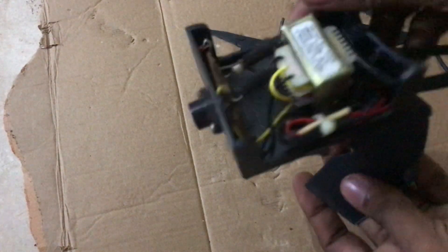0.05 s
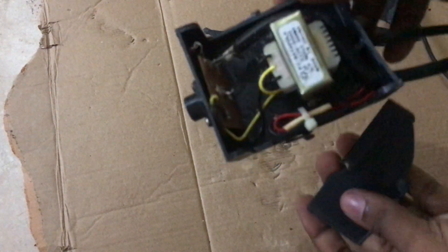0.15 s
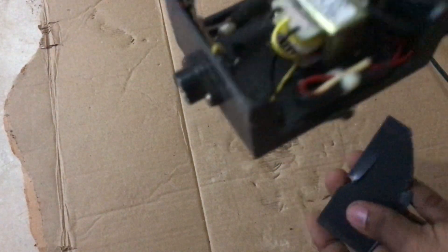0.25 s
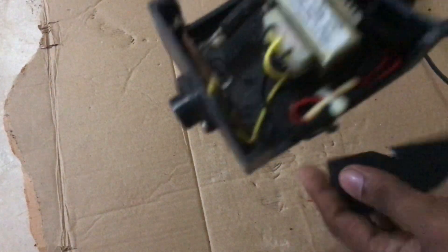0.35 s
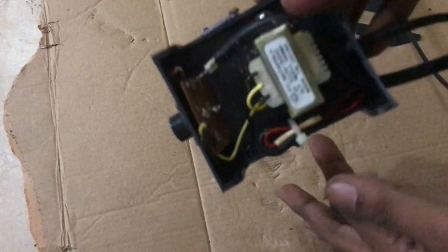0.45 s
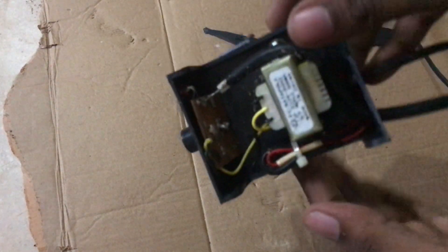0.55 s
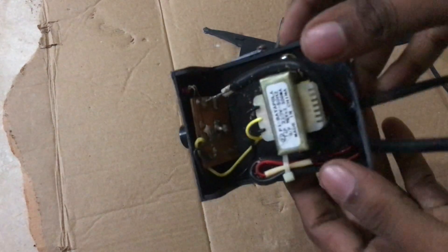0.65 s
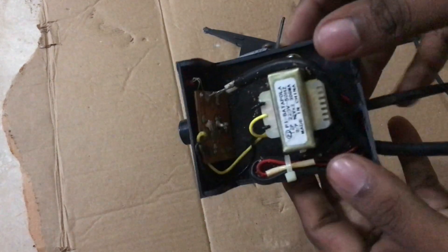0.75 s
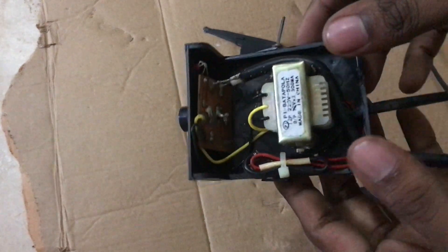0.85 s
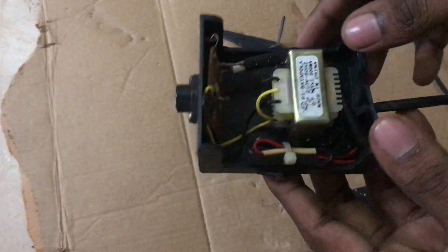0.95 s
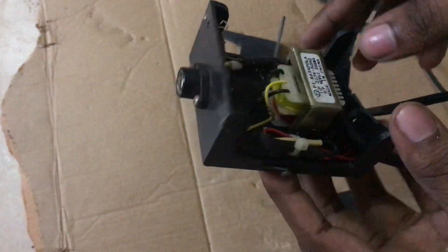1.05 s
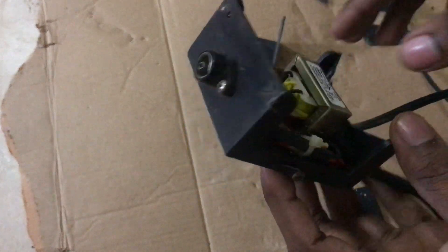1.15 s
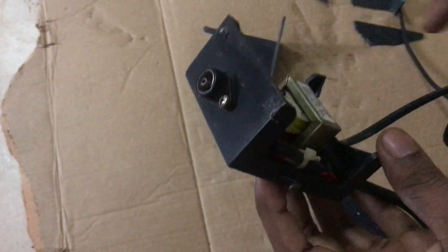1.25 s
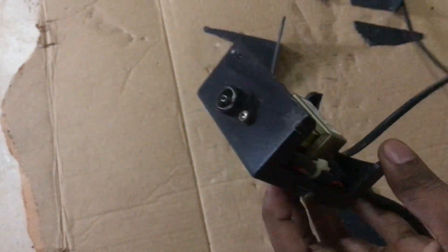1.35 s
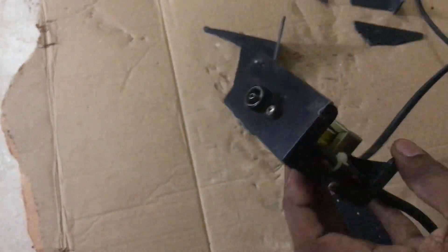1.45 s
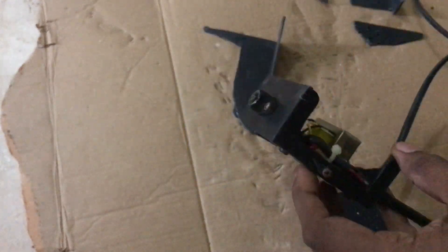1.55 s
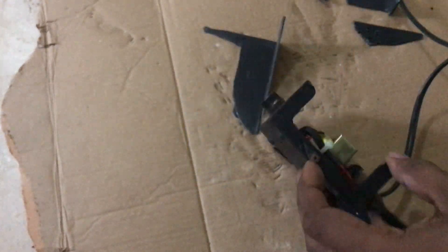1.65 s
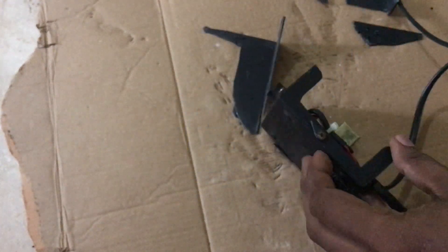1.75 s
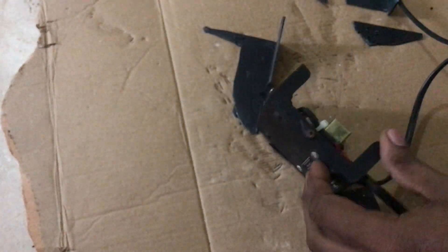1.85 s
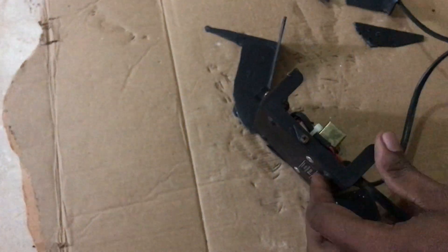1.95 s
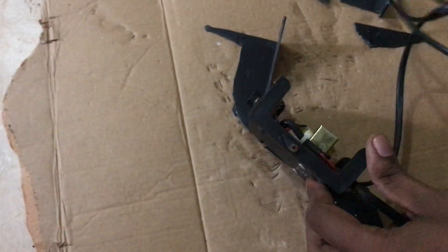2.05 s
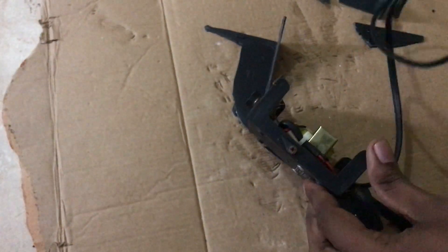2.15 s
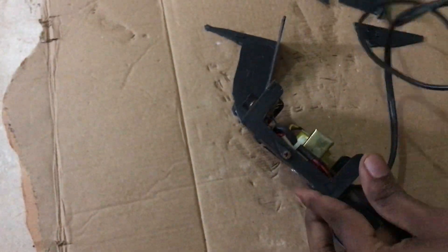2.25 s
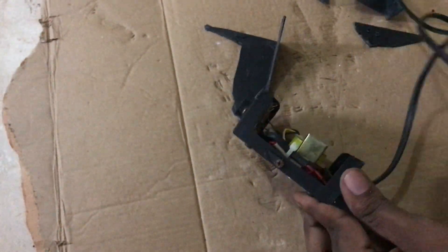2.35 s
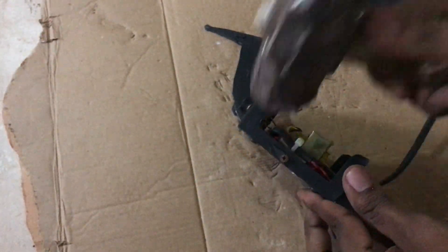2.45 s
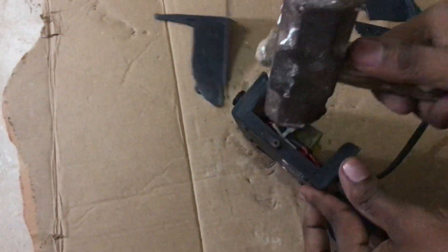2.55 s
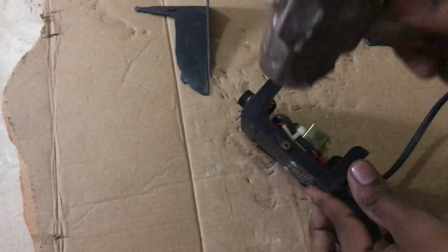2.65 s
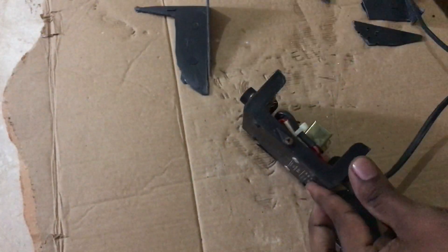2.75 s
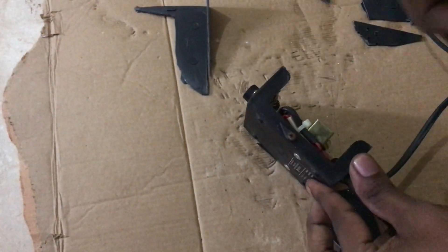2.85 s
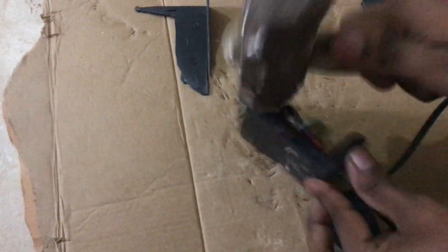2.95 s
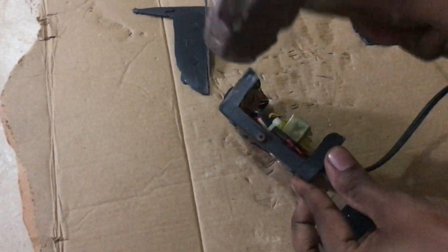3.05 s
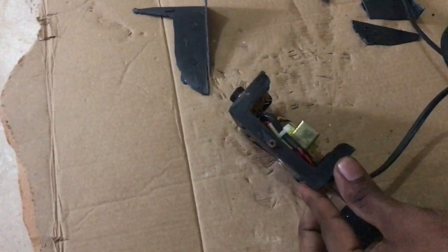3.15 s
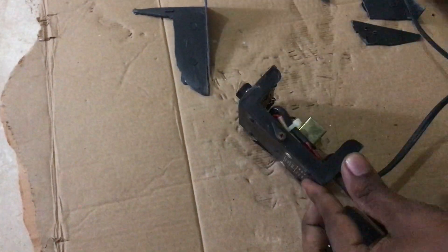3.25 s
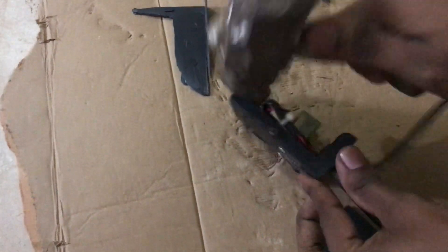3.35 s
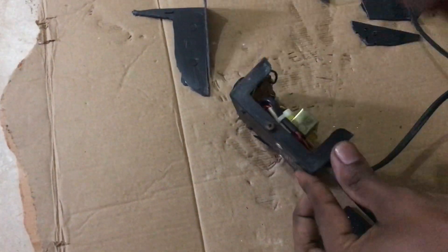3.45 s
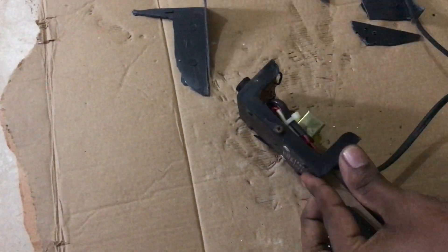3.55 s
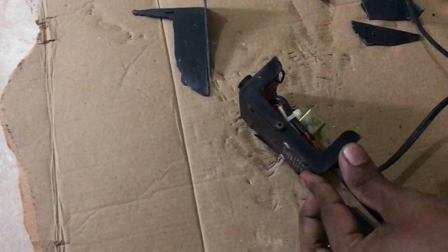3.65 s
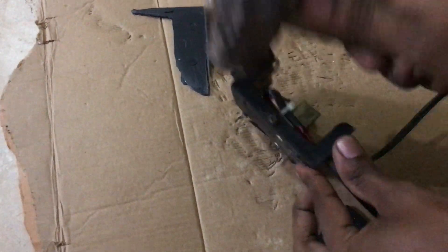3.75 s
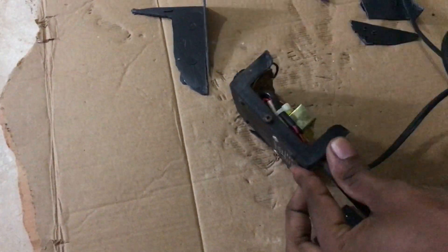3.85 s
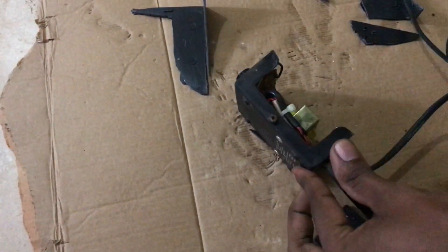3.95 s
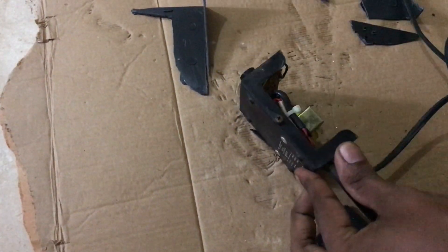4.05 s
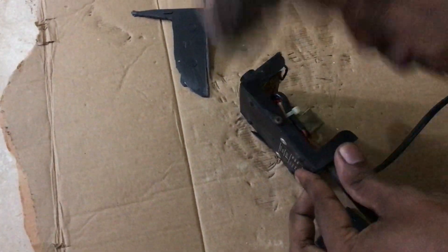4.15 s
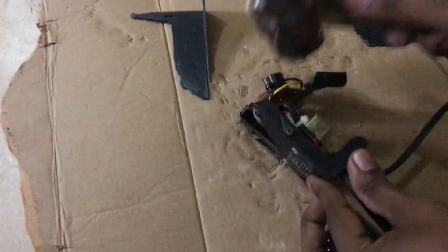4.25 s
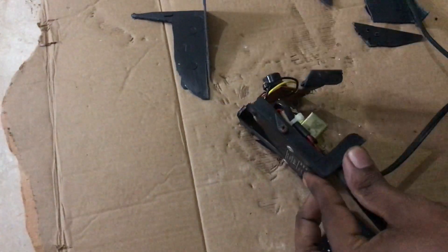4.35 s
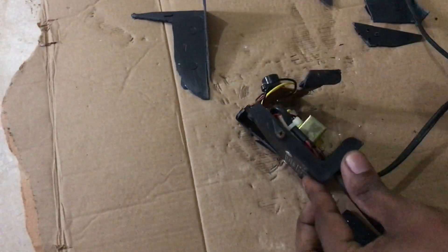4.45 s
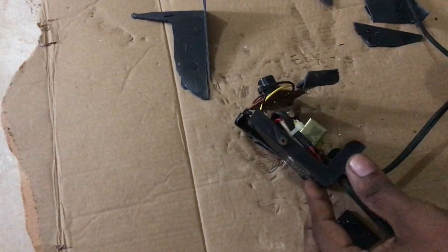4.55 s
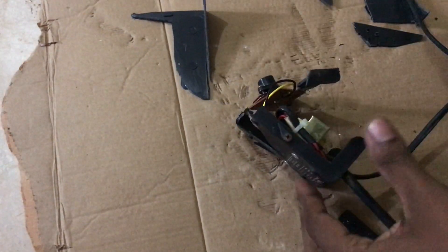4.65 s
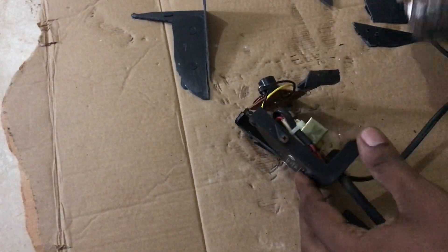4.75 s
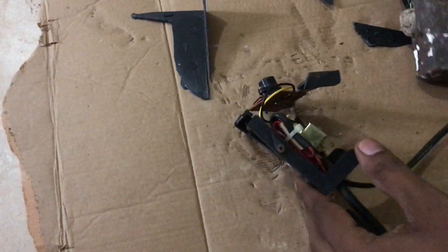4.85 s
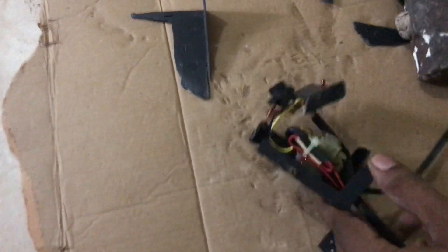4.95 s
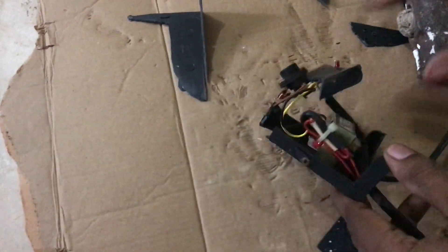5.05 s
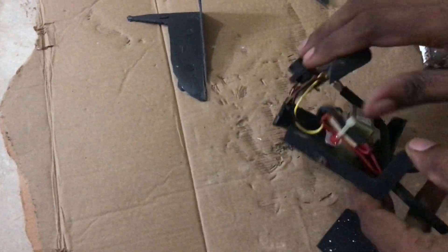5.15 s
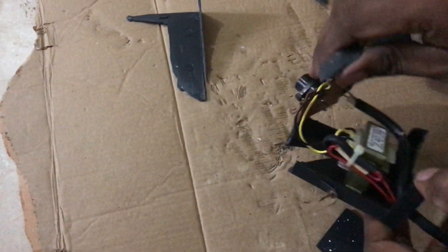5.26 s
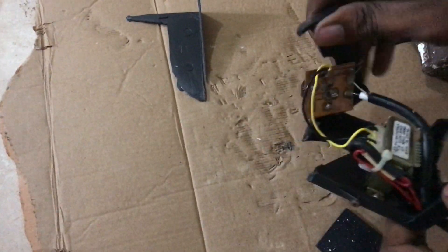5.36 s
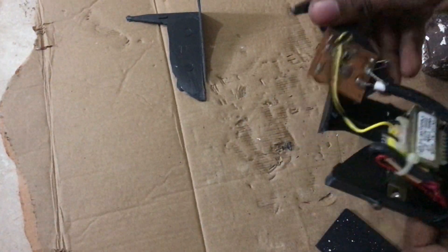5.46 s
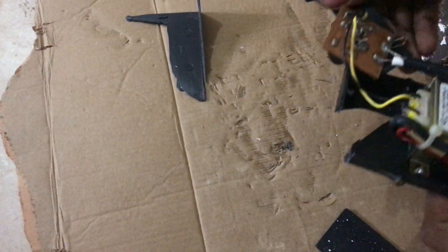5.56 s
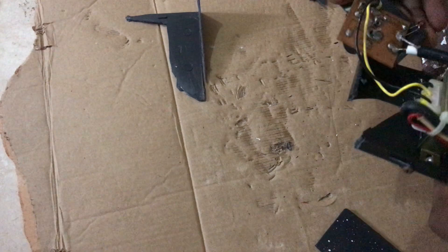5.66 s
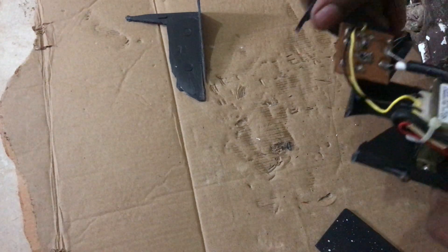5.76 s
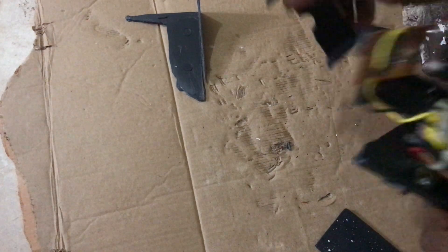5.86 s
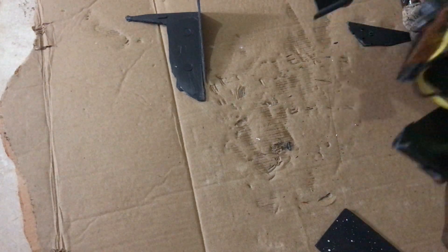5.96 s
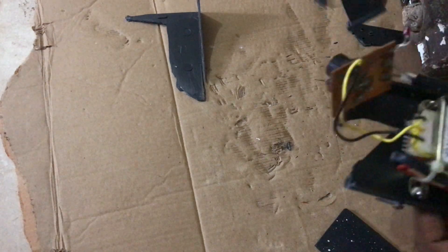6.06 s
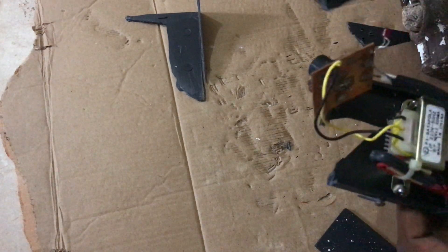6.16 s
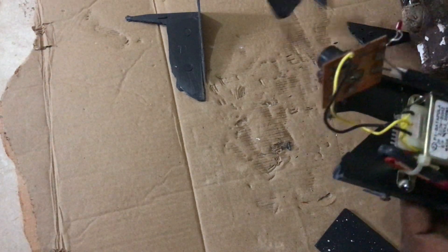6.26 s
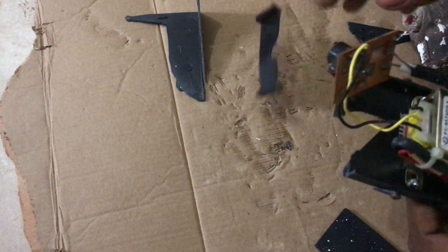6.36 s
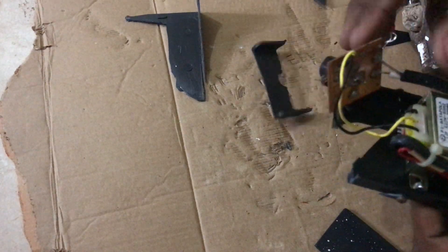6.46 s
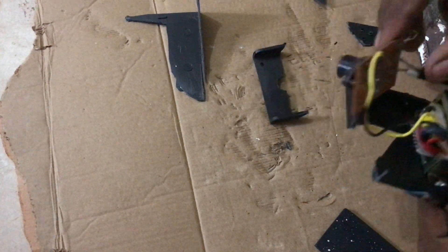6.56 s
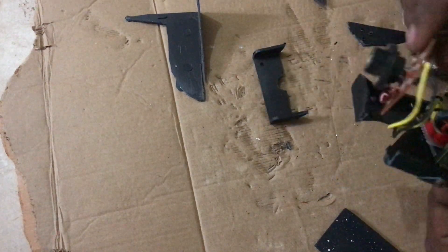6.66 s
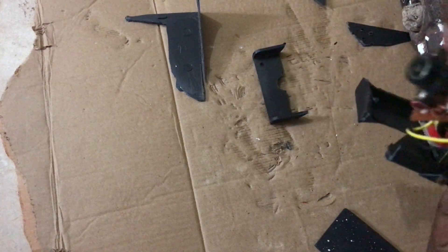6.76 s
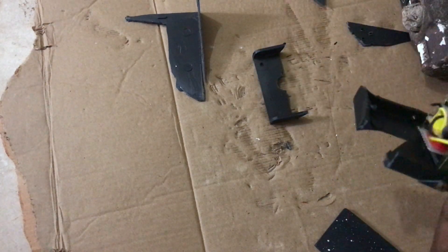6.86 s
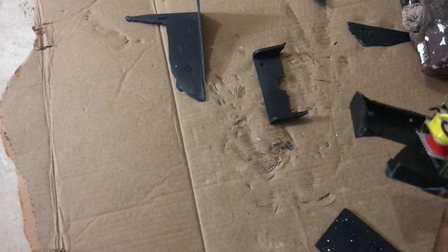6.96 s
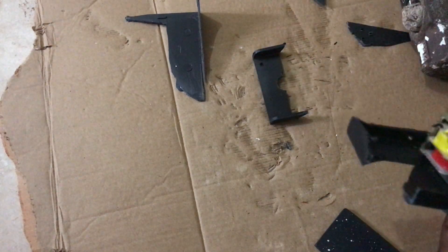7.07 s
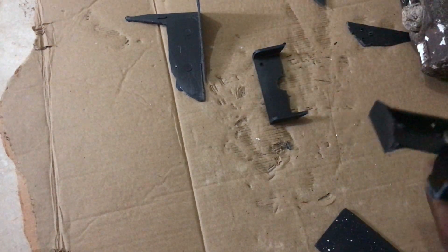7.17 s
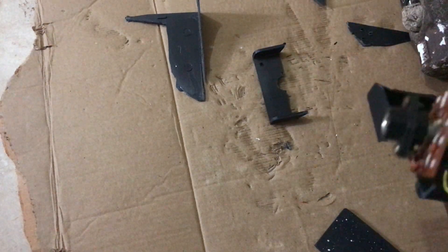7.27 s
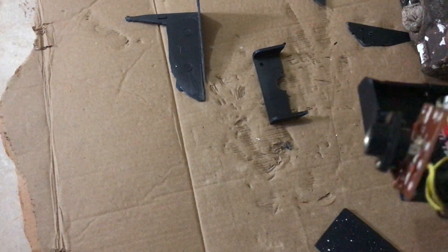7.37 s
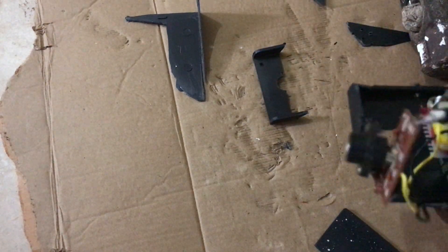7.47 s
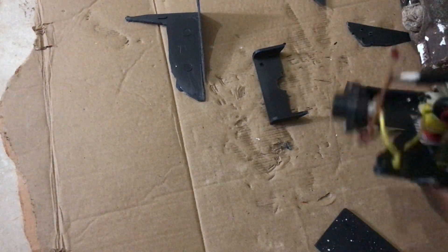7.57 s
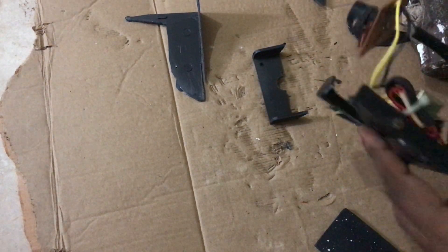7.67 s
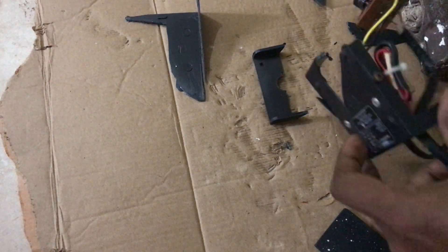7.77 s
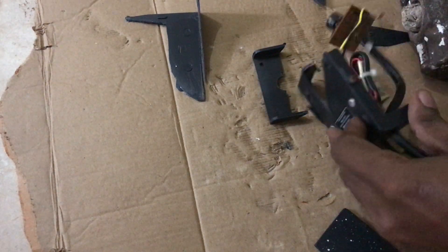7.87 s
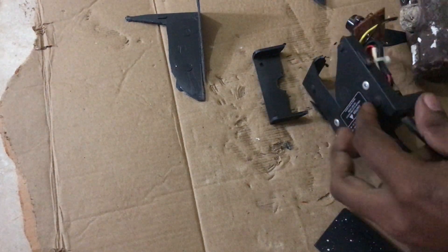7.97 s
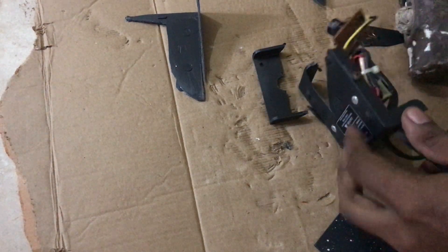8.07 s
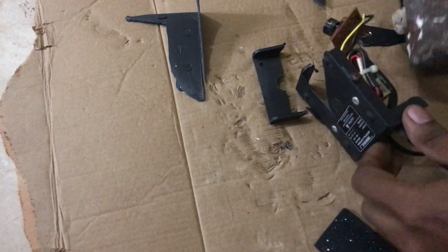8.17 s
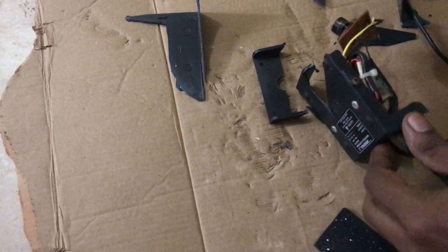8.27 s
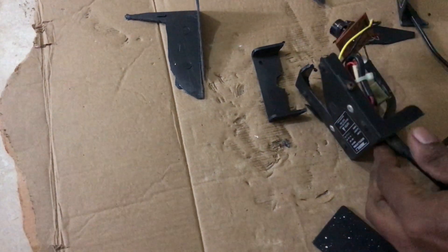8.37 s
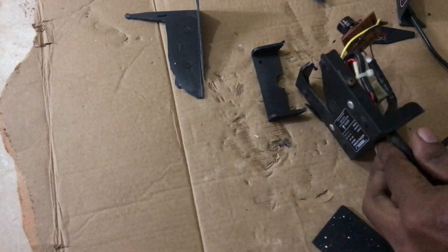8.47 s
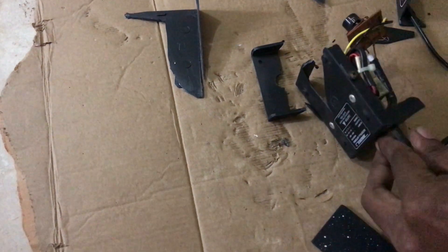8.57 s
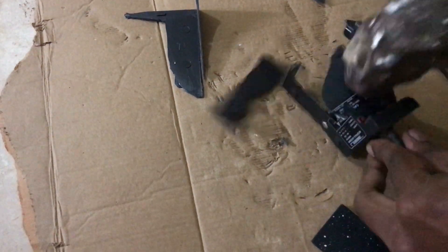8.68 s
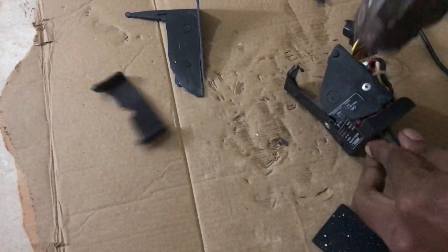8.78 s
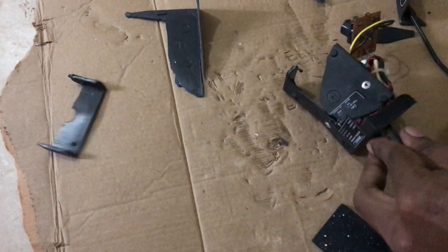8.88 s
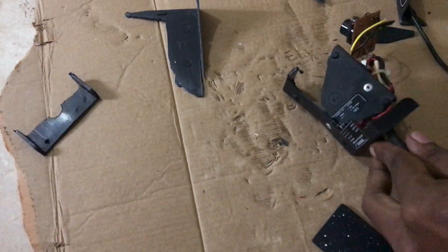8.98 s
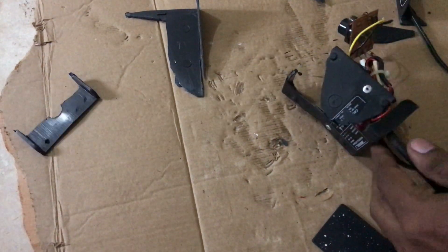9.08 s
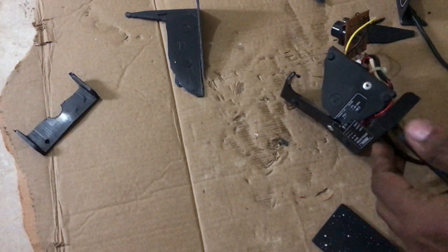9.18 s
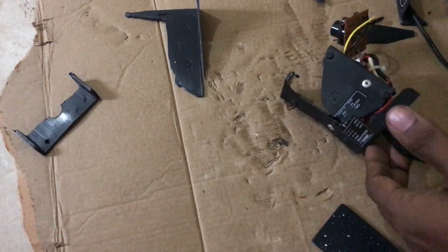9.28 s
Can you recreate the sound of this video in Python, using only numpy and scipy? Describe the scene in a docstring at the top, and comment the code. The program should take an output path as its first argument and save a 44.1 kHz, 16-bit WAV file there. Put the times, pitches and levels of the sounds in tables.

```python
"""In a bare room, a plastic electronics case on cardboard is turned over, hit with a steel mallet and snapped apart by hand.
Each crack is a short noise burst that rings the shell and the room; steel and shell also ring as fluttering sines.
Heavy blows shake the floor as a short wave of falling pitch. Handling is flickering, grainy noise;
rubs, low thuds and an earlier blow's dying sound are bands of noise. Outside, a bird whistles in gliding sines, and
far traffic is low noise with wavering tones. Loud moments pull the recorder's gain down, and it creeps back."""
import sys
import numpy as np
from scipy import signal
from scipy.fft import rfft, irfft
from scipy.io import wavfile
from scipy.ndimage import uniform_filter1d

SR = 44100
rng = np.random.default_rng(int(sys.argv[2]) if len(sys.argv) > 2 else 0)


def int16_out(signal):
    """Quantize to a 16-bit WAV file."""
    q = np.round(np.clip(np.atleast_2d(signal).T, -1, 1) * 32767)
    wavfile.write(sys.argv[1], SR, q.astype(np.int16))


N = 411012

# far traffic, and the microphone's hiss: f/Hz, relative level per Hz/dB
TRAFFIC_COLOUR = [(12, -44.5), (20, -26.5), (36, -4.5), (81, 4), (97, -2), (108, -11), (139, -0.5),
                  (166, -10.5), (242, -14), (276, -29), (425, -26), (449, -32), (500, -34.5), (650, -59.5),
                  (1100, -120)]
HISS_COLOUR = [(150, -34.5), (250, -11), (309, -9.5), (423, -17), (454, -17.5), (741, -9.5), (823, -23.5),
               (899, -16), (1070, -13.5), (2620, -25), (7500, -23.5), (8780, -20), (10300, -36),
               (13400, -19.5), (16500, -40)]
TRAFFIC_DB, HISS_DB = -57.5, -67
# wavering engine tones: start t/s, end t/s, f/Hz, level/dB
ENGINE_TONES = [(0, 4.1, 90, -62), (1.0, 3.2, 157, -77.5), (5.1, 8.6, 130, -60)]
# bird calls, each a curve: t/s, f/Hz, level/dB
BIRD_CALLS = [
    [(.74, 5710, -62), (.78, 5720, -64), (.9, 5270, -67), (1.0, 5080, -66), (1.1, 5014, -67),
     (1.2, 5020, -91), (1.28, 5100, -70)],
    [(1.28, 5700, -84), (1.4, 6150, -67), (1.5, 5350, -71), (1.56, 4800, -70), (1.62, 4550, -68),
     (1.66, 4450, -84)],
    [(9.06, 5700, -67), (9.12, 5650, -73.5), (9.22, 5420, -69.5), (9.32, 5090, -69.5)],
]

# fingers on plastic and card, two spells of handling: t/s, middle level/dB, treble level/dB
RUSTLE_LEVELS = [
    [(0.0, -48.5, -88), (0.19, -65, -72), (0.42, -85, -70), (0.57, -65, -69), (0.72, -80, -72),
     (1.24, -73, -72), (1.52, -69.5, -61), (1.73, -54, -104), (1.85, -63, -54.5), (2.05, -50, -57),
     (2.24, -65.5, -69), (2.47, -69.5, -70), (2.55, -49.5, -67)],
    [(6.3, -91, -76), (6.41, -83, -76), (6.54, -59, -68), (6.63, -62.5, -71.5), (6.81, -74, -79),
     (7.04, -100, -79), (7.61, -80, -76), (7.8, -85, -73), (7.98, -62.5, -58), (8.11, -65, -74),
     (8.34, -51.5, -60), (8.5, -67.5, -70), (8.73, -90, -80)],
]
RUSTLE_FLICKER_DB = 2.5
RUSTLE_LOW_DB = -7.5   # the low layer follows the middle one
# rubs, low thuds and the dying sound of an earlier blow, as bands of noise:
# start t/s, end t/s, f/Hz, width f/Hz, starting level/dB
NOISE_BANDS = [(0, 0.182, 1900, 700, -50), (0, 0.153, 686, 150, -61), (0.1, 0.378, 1900, 400, -66),
               (0.385, 0.535, 3000, 1600, -51.5), (1.23, 1.308, 3020, 1300, -58.5),
               (2.042, 2.11, 2940, 900, -45), (2.41, 2.563, 3420, 1500, -56),
               (4.481, 4.718, 325, 60.5, -42.5), (5.023, 5.094, 200, 153, -43),
               (6.354, 6.496, 200, 200, -44.5), (7.557, 7.749, 3630, 600, -64),
               (7.565, 7.718, 7150, 710, -71.5), (8.781, 9.037, 3700, 400, -41.5),
               (8.938, 9.057, 1940, 400, -40)]

# steel parts touched: t/s, level/dB, tilt per octave/dB
STEEL_TAPS = [(4.488, -36, 10.0), (4.613, -43, -16.0)]
# ringing notes of the steel: f/Hz, level/dB, time to fall 60 dB t/s
STEEL_MODES = [(5868, -17, .6), (5990, -14, .6), (6325, -12, .8), (7180, -3, .65), (7245, -1, .65),
               (7330, -4, .5), (8613, -12, .25), (11500, -11, .2), (11670, -9, .2), (12600, -11, .15),
               (13840, -12, .15)]
# lone rings of the shell and of metal: t/s, f/Hz, level/dB, time to fall 60 dB t/s
LONE_RINGS = [(.88, 1180, -55, .2), (2.556, 1064, -32, .4), (3.43, 11850, -53, 2.0),
              (5.427, 1180, -34, .15), (5.903, 1180, -36, .2), (8.95, 1640, -62, 1.2)]

# floor shakes after heavy blows: t/s, level/dB, signed strength (+ up, - down), length t/ms
SHAKES = [(3.048, -3, -0.71, 30), (3.433, -1, 1, 26), (3.8192, -5.5, 1, 9.3), (4.261, -1.5, -0.82, 31),
          (8.74, -11, -1.4, 30), (8.748, -8.5, 1, 28)]
FLOOR_HZ, GLIDE_CYCLES, GLIDE_MS = 52, .79, 3.0
# notes a shake leaves ringing in the floor: f/Hz, level/dB, time to fall 60 dB t/s
FLOOR_MODES = [(200, -15, 0.054), (310, -22, 0.034)]
# a faint dull knock with a small low thump about 20 ms before a heavy blow: t/s, level/dB
FAINT_KNOCKS = [(3.021, -38.5), (3.405, -27.5), (3.794, -34.5), (4.235, -23), (8.715, -34)]
FAINT_KNOCK_HZ, FAINT_KNOCK_BODY_DB, FAINT_KNOCK_EDGE_DB, FAINT_KNOCK_T60_S = 700, -12.5, -12.5, 0.18
FAINT_KNOCK_SHAKE_DB, FAINT_KNOCK_SHAKE_MS = -4, 25   # the small low thump

# mallet blows, snaps and dropped pieces: t/s, level/dB, brightest f/Hz, body level/dB, edge level/dB,
# burst time to fall 60 dB t/s, room level/dB
CRACKS = [(0.555, -8.5, 4300, -25, -21, 0.013, -33.5), (0.562, -15.5, 3020, -20, -13, 0.042, -24.5),
          (0.676, -30, 2400, -21.5, -24.5, 0.037, -31), (1.715, -20, 2740, -23, -24, 0.053, -27.5),
          (2.006, -25, 12000, -43, -4.5, 0.017, -35.5), (2.014, -12, 12700, -46.5, 2, .007, -26),
          (2.02, -14.5, 12300, -34, 1, 0.06, -30), (2.035, -25, 12000, -35, -10, .05, -35),
          (2.070, -27.5, 2820, -32, -16, 0.037, -26), (2.453, -22, 3140, -25.5, -26.5, 0.012, -25.5),
          (2.554, 0.5, 890, -13.5, -13.5, 0.024, -24.5), (2.563, -0.5, 1010, -16.5, -16, 0.041, -21),
          (2.640, -16, 980, -16.5, -22.5, 0.11, -33.5), (3.042, 2.5, 1070, -16.5, -14, 0.025, -15),
          (3.428, 7, 1004, -21.5, -18, 0.027, -14.5), (3.818, 1.5, 1190, -25, -16.5, 0.11, -10),
          (3.825, -1, 1300, -9.5, -26, 0.074, -15), (4.255, 5, 3460, -16.5, -14.5, 0.026, -21.5),
          (4.264, 4, 1100, -20.5, -13.5, 0.17, -18), (4.481, -10.5, 1130, -15.5, -20, 0.036, -15.5),
          (4.489, -11, 7160, -10, -15, 0.12, -13.5), (4.614, -18.5, 6940, -16, -12, 0.034, -16.5),
          (4.875, -19, 3350, -18, -15.5, 0.046, -21), (4.883, -19, 8800, -14, -11, 0.052, -32),
          (4.894, -6.5, 5950, -22, -19, 0.035, -23), (4.908, -0.5, 3250, -21.5, -16, 0.0055, -27.5),
          (4.924, -18, 2900, -29, -28, .05, -22), (5.211, -1.5, 3600, -34, -37.5, .014, -31.5),
          (5.226, -12.5, 4200, -31, -43, 0.024, -26), (5.241, -18.5, 1950, -26, -35.5, .05, -19),
          (5.419, -20.5, 1180, -15, -19.5, 0.093, -29), (5.429, -15, 1260, -14, -25, 0.037, -27.5),
          (5.508, -4.5, 8400, -27, 8.5, .015, -31), (5.535, -13, 4360, -18, -12, 0.046, -28),
          (5.577, -27.5, 1160, -9.5, -21, 0.046, -33), (5.716, -6, 5900, -34.5, -13.5, .014, -33.5),
          (5.897, -21.5, 7260, -32, -11, 0.031, -25.5), (5.901, -7.5, 1200, -22, -14.5, 0.036, -29.5),
          (5.912, -19, 1195, -12, -21, 0.075, -31), (6.365, -21, 965, -24, -25.5, 0.033, -24),
          (6.461, -29, 4600, -27, -13, 0.017, -31), (6.521, -17.5, 3500, -24.5, -21.5, 0.0072, -31.5),
          (6.568, -21.5, 3370, -38, -26, 0.019, -31), (6.584, -31.5, 3900, -9.5, -7, 0.021, -25),
          (7.952, -28, 632, -12, -9, 0.067, -28), (7.959, -29.5, 1230, -14.5, -7, 0.023, -22.5),
          (8.178, -27.5, 13500, -32, -11, 0.017, -28), (8.329, -31, 1234, -21.5, -12.5, 0.05, -28),
          (8.736, 2.5, 1790, -19, -14, 0.025, -21), (8.745, -2.5, 1140, -23.5, -18, 0.11, -16),
          (8.952, -24, 1960, -28, -24.5, 0.019, -13)]
# light ticks of the case in the hands: t/s, level/dB, brightest f/Hz, edge level/dB
TICKS = [(0.298, -33.5, 13300, -12), (0.383, -43, 2980, -14), (0.434, -37.5, 2650, -19),
         (0.476, -37, 3000, -18), (0.502, -40, 3720, -19), (0.711, -38, 1480, -27), (0.735, -38, 2810, -28),
         (0.865, -44.5, 5470, -40), (1.249, -61, 2990, -15), (1.436, -35.5, 4550, -14.5),
         (1.504, -42, 5400, -18), (1.625, -36, 3480, -24), (1.666, -37, 2700, -10), (1.847, -58, 2870, -13),
         (1.859, -37, 11500, -13), (1.942, -33, 2620, -14), (1.956, -37, 3620, -19),
         (2.165, -37.5, 2900, -14), (2.237, -38, 10800, -17), (2.314, -43, 5140, -5),
         (2.359, -50, 3670, -21), (2.4, -41, 1430, -22), (2.896, -36, 4600, -17), (3.013, -31.5, 1060, -10),
         (4.858, -32, 3300, -21), (5.377, -41, 4230, -21), (5.385, -34, 1160, -18),
         (5.65, -36.5, 1090, -11), (5.66, -31, 1120, -33), (6.625, -34, 3500, -24),
         (7.217, -38.5, 1050, -15), (7.299, -35, 3500, -19), (7.709, -41.5, 1380, -20),
         (7.724, -34.5, 9150, -18.5), (7.732, -36.5, 1320, -17), (7.907, -47, 1430, -13),
         (7.967, -29.5, 1530, -27), (8.126, -40, 1330, -25), (8.168, -34, 13200, -11),
         (8.231, -37, 5990, -19), (8.256, -31.5, 3150, -18), (8.311, -36, 2660, -17),
         (8.426, -35, 2750, -5), (8.51, -39.5, 4630, -14), (8.621, -48, 7150, -9), (8.635, -47, 7350, -11),
         (8.981, -34, 1640, -8), (9.022, -31, 1885, -16)]
TICK_BODY_DB, TICK_T60_S, TICK_ROOM_DB = -23.5, 0.027, -25
# loose bits rattle after every crack louder than the threshold
RATTLE_FROM_DB, RATTLE_COUNT, RATTLE_EDGE_DB = -6, 7, -16
RATTLE_DB, RATTLE_FADE_DB_PER_S, RATTLE_S = -26, 111, 0.16

# six colour bands of a crack: centre f/Hz
BAND_HZ = np.array([380, 950, 2000, 3700, 6700, 11600])
# width of each band: f/Hz
BAND_WIDTH_HZ = np.array([300, 950, 1200, 2300, 4000, 6000])
# share of the body level, and of the edge level, in each band (no unit)
BODY_SHARE = np.array([1, 0.95, 0.44, 0.041, 0, 0])
EDGE_SHARE = np.array([0, 0, 0.092, 0.41, 0.94, 1.34])
# each band's own level/dB
BAND_DB = [-17, 0.7, -9.5, -9.5, -2, 2]
PEAK_DB, PEAK_OCTAVES = 6.5, 0.28   # bump at the brightest frequency
RIPPLE_DB = 2.2   # every broken piece has resonances of its own
BURST_START_DB = -7.5   # starting level of the burst's noise
SNAP_DB = 15.5   # the first instant of a crack stands above the burst
SNAP_PER_BODY_DB = 0.1   # cracks with more body snap a little harder
# ringing notes of the shell and the card below it: f/Hz, level/dB, time to fall 60 dB t/s
SHELL_MODES = [(655, -8, .06), (850, -8, .05), (970, -6, .06), (1064, -4, .07), (1170, -6, .06),
               (1300, -9, .05), (1475, -12, .05), (2046, -12, .04), (2550, -13, .04), (3400, -12, .035),
               (4245, -12, .035)]
SHELL_UNDER_BODY_DB, SHELL_ROOM_DB = -12.5, -0.5
SHELL_DETUNE = .04   # the broken shell is held differently at every knock

# how long the room rings: f/Hz, time to fall 60 dB t/s
ROOM_T60 = [(200, 0.6), (530, 0.3), (1400, 0.55), (3700, 0.45), (9700, 0.33), (16000, 0.2)]
ROOM_RISE_MS = 5.1
BIRD_ROOM_DB, RINGS_ROOM_DB, SHAKE_ROOM_DB = -27.5, -32.5, -48

PORT_DIP_HZ, PORT_DIP_Q, PORT_DIP_SHARE = 10540, 18, 0.4
PORT_TOP_HZ, CUTOFF_HZ = 15620, 17050
# gain control: above the knee the gain falls by a share of the excess, slowly, and creeps back
KNEE_DB, SQUEEZE, GAIN_ATTACK_S, GAIN_RETURN_DB_PER_S = -24, .5, .12, 9
CEILING = .63   # peaks are rounded off towards this height


def from_db(db):
    """Level in dB to gain."""
    return 10 ** (np.asarray(db) / 20)


def rms_one(x):
    """Scale to rms 1."""
    return x / np.sqrt(np.mean(x ** 2) + 1e-20)


def in_time(rows, column, outside=None):
    """One column of a curve at every sample."""
    rows = np.array(rows)
    return np.interp(np.arange(N) / SR, rows[:, 0], rows[:, column], outside, outside)


def log_grid(size):
    """Logarithm of every frequency in a spectrum of this size."""
    return np.log(np.maximum(np.arange(size // 2 + 1) * SR / size, 1))


def coloured(hz, db, size):
    """Noise whose dB per Hz follows the points on a log-frequency axis; rms 1."""
    gain = from_db(np.interp(log_grid(size), np.log(hz), db))
    return rms_one(irfft(rfft(rng.standard_normal(size)) * gain, size))


def drift(rate):
    """Chance wandering: straight lines between `rate` random points a second, whose spread is 1."""
    steps = rng.standard_normal(2000)
    return np.interp(np.arange(N) / SR * rate, np.arange(2000), steps)


def ring(clicks, hz, t60):
    """A unit click sets a sine of height 1 ringing, which then dies away."""
    shrink, turn = from_db(-60 / (t60 * SR)), 2 * np.pi * hz / SR
    feedback = [1, -2 * shrink * np.cos(turn), shrink * shrink]
    return signal.lfilter([0, np.sin(turn)], feedback, clicks + 1e-18)


def background():
    """Traffic rumble with a few wavering engine tones, and the microphone's hiss."""
    t = np.arange(N) / SR
    out = from_db(TRAFFIC_DB + 0.5 * drift(12)) * coloured(*np.transpose(TRAFFIC_COLOUR), N)
    out += from_db(HISS_DB) * coloured(*np.transpose(HISS_COLOUR), N)
    for start, end, hz, level_db in ENGINE_TONES:
        fade = np.clip(np.minimum(t - start, end - t) / 0.66, 0, 1)
        waver_db = 3 * drift(3)
        pitch = hz * (1 + 0.022 * drift(10.0))
        out += fade * from_db(level_db + waver_db) * np.sin(2 * np.pi * np.cumsum(pitch) / SR)
    return out


def bird():
    """Thin gliding whistles, mostly falling: sines a little unsteady in pitch and level."""
    out = np.zeros(N)
    for call in BIRD_CALLS:
        pitch = in_time(call, 1) * (1 + 0.006 * drift(200))
        level_db = in_time(call, 2, -200) + 2.0 * drift(47)
        out += from_db(level_db) * np.sin(2 * np.pi * np.cumsum(pitch) / SR)
    return out


def rustle():
    """Skin sliding on plastic and card: flickering noise with sparse fine grains."""
    grain_clicks = (rng.random(N) < 300 / SR) * rng.exponential(14, N)   # about 300 a second
    grains = 1 + uniform_filter1d(grain_clicks, size=40)
    low = coloured([400, 810, 1900, 2400, 3200], [-10, -16.0, -6.0, -25.5, -25], N)
    middle = coloured([1860, 2220, 3460, 6270, 7930], [-24.5, 4, 1.5, -4.5, -10.5], N)
    middle += from_db(RUSTLE_LOW_DB) * low
    treble = coloured([4480, 5940, 9000, 10770, 13000, 16820], [-32.0, 2.5, -21.0, 5, 1.5, 4.0], N)
    out = np.zeros(N)
    for spell in RUSTLE_LEVELS:
        out += middle * from_db(in_time(spell, 1, -200))
        out += treble * from_db(in_time(spell, 2, -200))
    return out * grains * from_db(RUSTLE_FLICKER_DB * drift(44))


def noise_bands():
    """Rubs, low thuds and an earlier blow's dying sound: uneven noise in one resonance, quick start, fading."""
    out = np.zeros(N)
    for start, end, hz, width_hz, level_db in NOISE_BANDS:
        at, size = round(start * SR), round((end - start) * SR)
        phase = np.arange(size) / size
        resonance = signal.iirpeak(hz, hz / width_hz, fs=SR)
        noise = signal.lfilter(*resonance, rng.standard_normal(SR))[:size]
        noise = signal.lfilter(*resonance, noise)   # twice, for a narrower colour
        ends = np.minimum(1, 12 * np.minimum(phase, 1 - phase))
        out[at:at + size] += from_db(level_db - 10 * phase) * ends * rms_one(noise)
    return out * from_db(2 * drift(66))


def steel_and_lone_rings():
    """Long high modes of the mallet head and lone rings of shell and metal: dying sines, each fluttering."""
    rings = list(LONE_RINGS)
    for s, tap_db, tilt_db in STEEL_TAPS:
        for hz, mode_db, t60 in STEEL_MODES:
            rings.append((s, hz, tap_db + mode_db + tilt_db * np.log2(hz / 7200), t60))
    out = np.zeros(N)
    for s, hz, level_db, t60 in rings:
        click = from_db(level_db) * (np.arange(N) == round(s * SR))
        out += ring(click, hz, t60) * from_db(5 * drift(140))   # loose contact makes it flutter
    return out


def shakes():
    """A bending wave in the floor: its fast parts come first, so the pitch falls to the floor's own note."""
    out, clicks, glide = np.zeros(N), np.zeros(N), GLIDE_MS / 1000
    t = np.arange(-.004, .08, 1 / SR)   # starts shortly before the main push
    cycles = FLOOR_HZ * t + GLIDE_CYCLES * (1 - np.exp(-t / glide))
    wave = np.cos(2 * np.pi * cycles)
    rise = np.clip(1 + t / 0.0027, 0, 1) ** 2
    knock_shakes = [(s, db + FAINT_KNOCK_SHAKE_DB, 1, FAINT_KNOCK_SHAKE_MS) for s, db in FAINT_KNOCKS]
    for s, level_db, push, length_ms in list(SHAKES) + knock_shakes:
        fall = np.exp(-(np.maximum(t, 0) * 1000 / length_ms) ** 3)
        at = round((s + t[0]) * SR)
        out[at:at + len(t)] += push * from_db(level_db) * rise * fall * wave
        clicks[round(s * SR)] = push * from_db(level_db)
    for hz, mode_db, t60 in FLOOR_MODES:
        out += from_db(mode_db) * ring(clicks, hz, t60)
    return out


def rattle():
    """Loose bits tick at random moments and pitches after each loud crack, on the whole fainter the later."""
    bits = []
    for s, db, *_ in CRACKS:
        if db > RATTLE_FROM_DB:
            for late, soft, pitch in rng.random((RATTLE_COUNT, 3)):
                delay = RATTLE_S * late
                level_db = db + RATTLE_DB - RATTLE_FADE_DB_PER_S * delay - 8 * soft
                bits.append((s + .02 + delay, level_db, 900 * 8 ** pitch))
    return bits


def causal_pulse(log_gain):
    """The minimum-phase pulse with this spectrum, which puts its energy first (folded cepstrum); energy 1."""
    fold = irfft(log_gain)
    fold[1:len(fold) // 2] *= 2
    fold[len(fold) // 2 + 1:] = 0
    pulse = irfft(np.exp(rfft(fold)))
    return pulse / np.sqrt(np.sum(pulse ** 2))


def crack_pulse(bright_hz, body_db, edge_db, size):
    """The colour of one crack as a pulse: body and edge bands, a bright bump and chance ripples."""
    hz = np.geomspace(60, 20000, 120)
    per_hz = BAND_DB + BODY_SHARE * body_db + EDGE_SHARE * edge_db - 10 * np.log10(BAND_WIDTH_HZ)
    colour = np.interp(np.log(hz), np.log([100, *BAND_HZ]), [per_hz[0] - 12, *per_hz])
    colour += PEAK_DB * np.exp(-.5 * (np.log2(hz / bright_hz) / PEAK_OCTAVES) ** 2)
    colour += np.repeat(rng.normal(0, RIPPLE_DB, len(hz) // 2), 2)
    return causal_pulse(np.interp(log_grid(size), np.log(hz), colour) * np.log(10) / 20)


def shell_ring(body_db, t):
    """The shell's modes struck once: dying sines, each a little off in level and pitch by chance."""
    mode_hz, mode_db, mode_t60 = np.array(SHELL_MODES).T[:, :, None]
    luck_db = rng.normal(0, 3, mode_db.shape)
    detune = rng.normal(0, SHELL_DETUNE, mode_hz.shape)
    level_db = body_db + SHELL_UNDER_BODY_DB + mode_db + luck_db - 60 * t / mode_t60
    modes = from_db(level_db) * np.sin(2 * np.pi * mode_hz * (1 + detune) * t)
    return modes.sum(axis=0)


def cracks():
    """Coloured bursts plus the shell's modes; returns the direct sound and what reaches the walls."""
    size = 4096
    t = np.arange(size) / SR
    direct, sent = np.zeros(N + size), np.zeros(N + size)
    knocks = list(CRACKS)
    for s, db, hz, edge_db in TICKS:
        knocks.append((s, db, hz, TICK_BODY_DB, edge_db, TICK_T60_S, TICK_ROOM_DB))
    for s, db in FAINT_KNOCKS:
        knocks.append((s, db, FAINT_KNOCK_HZ, FAINT_KNOCK_BODY_DB, FAINT_KNOCK_EDGE_DB,
                       FAINT_KNOCK_T60_S, TICK_ROOM_DB))
    for bit in rattle():
        knocks.append((*bit, TICK_BODY_DB, RATTLE_EDGE_DB, TICK_T60_S, TICK_ROOM_DB))
    for s, level_db, bright_hz, body_db, edge_db, t60, room_db in knocks:
        pulse = crack_pulse(bright_hz, body_db, edge_db, size)
        tearing = rng.standard_normal(size)
        tearing[0] = from_db(SNAP_DB + SNAP_PER_BODY_DB * (body_db - TICK_BODY_DB))
        tearing *= from_db(BURST_START_DB - 60 * t / max(t60, .002))
        burst = irfft(rfft(tearing) * rfft(pulse))   # gives the tearing noise the pulse's colour
        shell = shell_ring(body_db, t)
        at = round(s * SR)
        direct[at:at + size] += from_db(level_db) * (burst + shell)
        sent[at:at + size] += from_db(level_db + room_db) * (pulse + from_db(SHELL_ROOM_DB) * shell)
    return direct[:N], sent[:N]


def room(x):
    """Bare walls: octave bands of noise, each dying at its own rate after a short rise."""
    t = np.arange(SR) / SR
    white, tail = rng.standard_normal((2, SR)), np.zeros(SR)
    room_hz, room_t60 = np.array(ROOM_T60).T
    for k, hz in enumerate(125 * 2. ** np.arange(8)):
        edges = [hz / np.sqrt(2), min(hz * np.sqrt(2), .45 * SR)]
        t60 = np.interp(np.log(hz), np.log(room_hz), room_t60)
        octave = signal.butter(2, edges, "band", fs=SR, output="sos")
        # neighbouring bands get unrelated noise
        tail += signal.sosfilt(octave, white[k % 2]) * from_db(-60 * t / t60)
    tail *= np.clip(1000 * t / ROOM_RISE_MS, 0, 1) ** 2
    return signal.fftconvolve(x, tail)[:N]


def scene():
    """All sources at one microphone."""
    direct, sent = cracks()
    whistle, rings, floor = bird(), steel_and_lone_rings(), shakes()
    sent = sent + from_db(BIRD_ROOM_DB) * whistle + from_db(RINGS_ROOM_DB) * rings
    wet = room(sent + from_db(SHAKE_ROOM_DB) * floor)
    return (direct + wet + floor + rings + rustle() + noise_bands() + whistle + background())[None]


def levelled(x):
    """Loud moments pull the gain down; it returns at a steady rate."""
    ramp = GAIN_RETURN_DB_PER_S * np.arange(N) / SR
    level_db = 10 * np.log10(uniform_filter1d(x ** 2, size=1000).clip(1e-12))
    wanted_cut_db = SQUEEZE * np.maximum(level_db - KNEE_DB, 0)
    # the highest cut so far, easing off along the ramp
    cut_db = np.maximum.accumulate(wanted_cut_db + ramp, axis=-1) - ramp
    keep = np.exp(-1 / (GAIN_ATTACK_S * SR))
    return x * from_db(-signal.lfilter([1 - keep], [1, -keep], cut_db))


def record(dry):
    """The microphone port dips near 10 kHz and falls at the top; gain control, rounded peaks, the top is cut."""
    dip = signal.lfilter(*signal.iirpeak(PORT_DIP_HZ, PORT_DIP_Q, fs=SR), dry)
    heard = dry - PORT_DIP_SHARE * dip
    heard = signal.sosfilt(signal.cheby1(8, 1, PORT_TOP_HZ, fs=SR, output="sos"), heard)
    heard = levelled(heard)
    rounded = heard / (1 + np.abs(heard / CEILING) ** 4) ** .25
    return signal.sosfilt(signal.cheby2(12, 70, CUTOFF_HZ, fs=SR, output="sos"), rounded)


dry = scene()
out = record(dry)
int16_out(out)
```